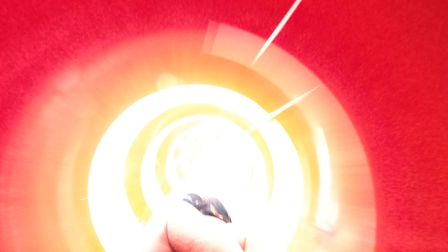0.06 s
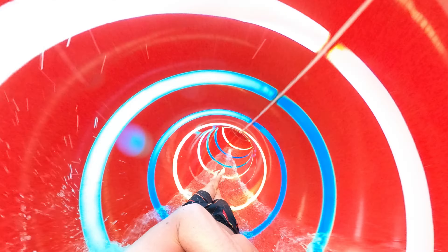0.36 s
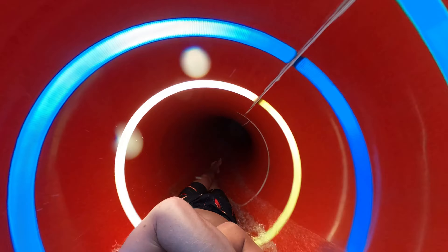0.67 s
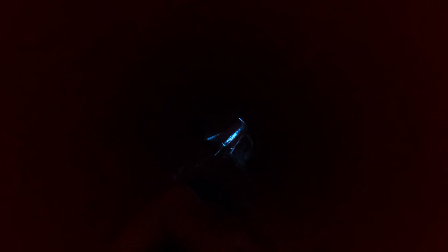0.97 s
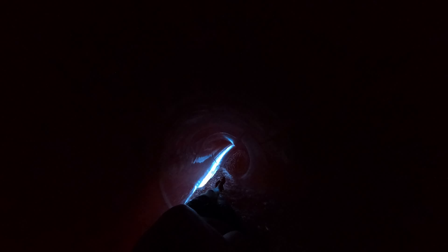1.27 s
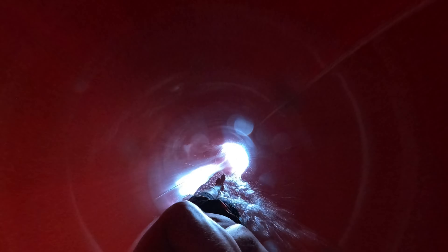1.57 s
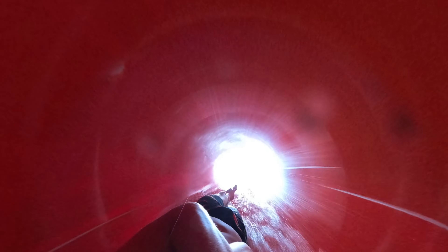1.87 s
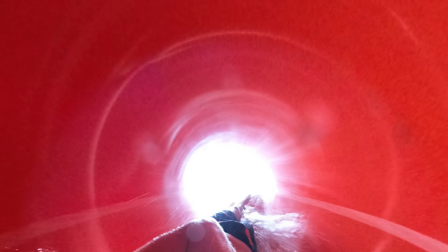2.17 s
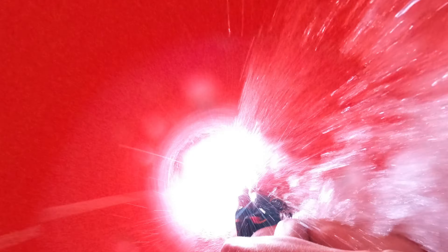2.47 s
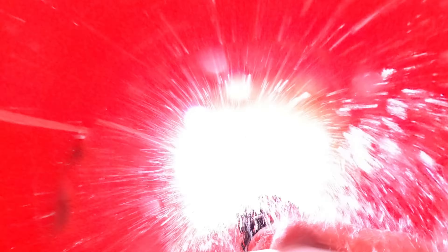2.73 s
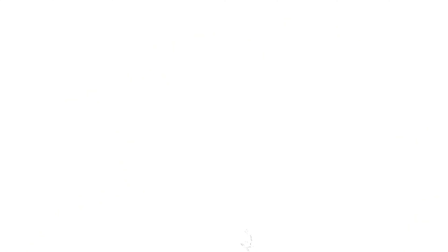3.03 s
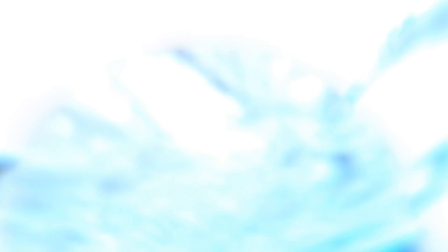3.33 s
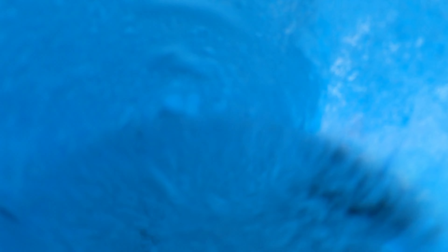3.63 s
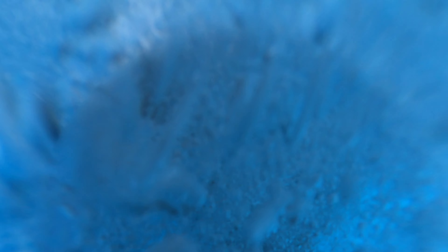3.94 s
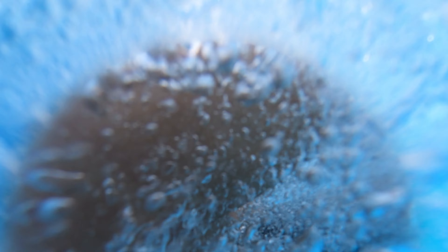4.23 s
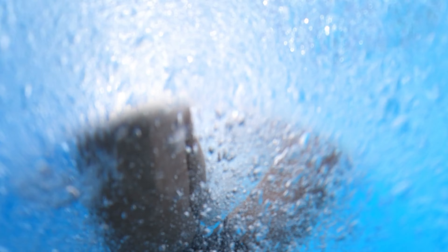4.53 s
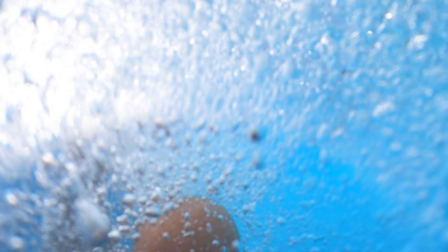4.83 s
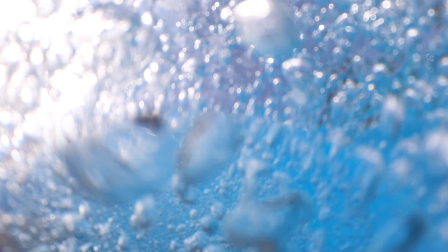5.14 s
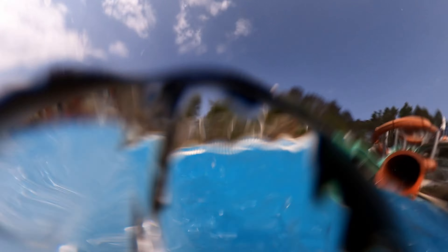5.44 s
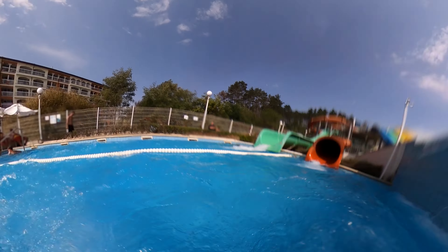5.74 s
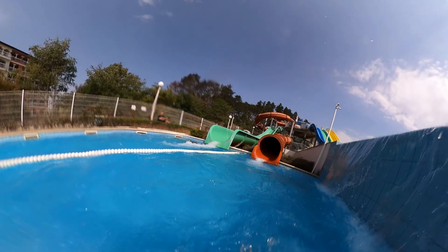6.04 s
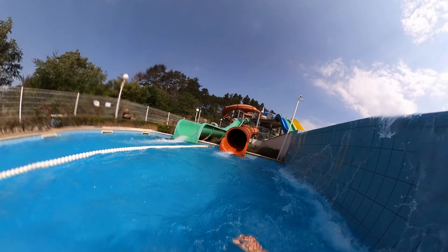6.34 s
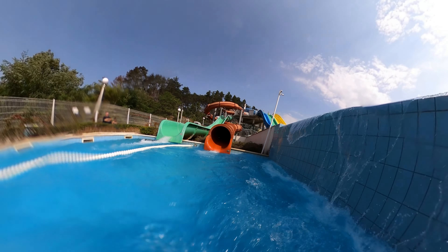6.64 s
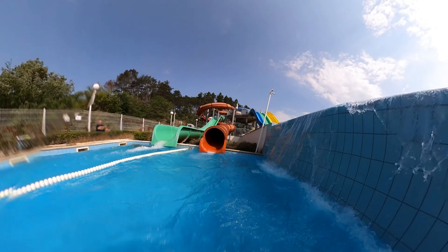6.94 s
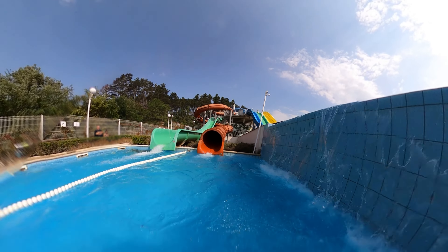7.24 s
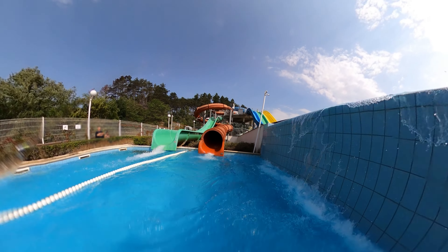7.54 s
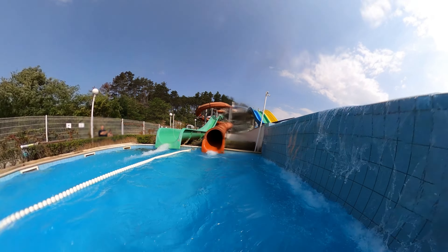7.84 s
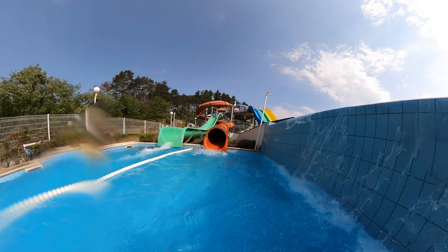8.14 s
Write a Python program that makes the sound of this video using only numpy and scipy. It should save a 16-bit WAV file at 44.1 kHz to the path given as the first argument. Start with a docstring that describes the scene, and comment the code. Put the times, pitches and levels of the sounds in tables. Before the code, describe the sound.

Water roars through a hollow tube slide, then a splashing plunge into loud underwater gurgling, and finally quieter, muffled pool lapping.

```python
"""Tube waterslide and its pool, heard from a riding microphone in a waterproof housing.
Water rushes in the ringing tube and air buffets the microphone port. Spray floods the port in the
run-out. The housing plunges into the pool through eddies, air cavities and ringing bubbles.
It surfaces with a water film over the port, so the wash of the pool swells up muffled."""
import sys
import numpy as np
from scipy import signal
from scipy.fft import rfft, irfft, next_fast_len
from scipy.io import wavfile
from scipy.ndimage import map_coordinates

SR = 44100
rng = np.random.default_rng(int(sys.argv[2]) if len(sys.argv) > 2 else 0)


def log_audio(samples):
    """Write samples as a 16-bit WAV file to the path given in sys.argv[1]."""
    # one column per channel
    frames = np.atleast_2d(samples).T
    # limit to full scale, then quantise
    limited = np.clip(frames, -1, 1)
    pcm = np.round(limited * 32767).astype(np.int16)
    wavfile.write(sys.argv[1], SR, pcm)


N = 370440
TIME_S = np.arange(N) / SR
EXIT_S, DIVE_S, SURFACE_S = 2.72, 3.48, 5.53  # out of the tube, under water, afloat
WET_PORT_HZ, BAND_LIMIT_HZ = 6000, 14500
BURST_TYPICAL_DB, BURST_REST_DB = -30.5, -52.5

# Noise spectra: freq_hz, density_db
SLIDES_SPECTRUM = [(100, -4.5), (300, -6.5), (520, -0.5), (700, -7.5), (1000, -17), (2000, -31),
                   (6000, -88)]  # slides across the pool
SWELL_SPECTRUM = [(12, -1), (32, 3), (55, 3.5), (90, -3), (200, -22.5), (3000, -120)]  # water pressing on the housing
WASH_SPECTRUM = [(50, -26.5), (100, -2), (150, 2), (250, -2), (380, -2.5), (520, -1.5), (680, -2),
                 (950, -10), (1300, -19.5), (2000, -39.5), (4000, -59.5)]  # lapping waves
FOAM_SPECTRUM = [(600, -4.5), (1400, 3), (2000, -1), (2700, -8.5), (3500, -18), (4300, -24.5), (5400, -25),
                 (6400, -30), (8000, -35)]  # foam on the waves
BUFFET_SPECTRUM = [(10, -16), (25, -1), (50, -0.5), (80, -5), (125, -11.5), (190, -27.5), (400, -31.5),
                   (3000, -120)]  # air on the port
SHEET_SPECTRUM = [(80, -5.5), (200, -0.5), (400, -1.5), (800, -1.5), (1400, 0), (2100, -3.5), (3300, -4.5),
                  (5000, -15), (8000, -26.5), (14000, -80.5)]  # water sheet in the tube
SPRAY_SPECTRUM = [(800, -34), (2500, -9.5), (4000, -0.5), (5500, -2), (7000, -8.5), (8500, -15),
                  (10000, -21), (12000, -28.5), (14400, -45.5)]  # spray in the tube
SPLATTER_SPECTRUM = [(500, -0.5), (1100, 3.5), (1600, 0), (2300, -4), (3300, -7.5), (4500, -10),
                     (6000, -18.5), (8000, -23.5), (13000, -36)]  # run-out splashes
MIST_SPECTRUM = [(2000, -25.5), (4000, -2), (5300, -1), (6500, -2), (7500, -10), (9000, -21),
                 (12500, -25.5), (14400, -43)]  # fine run-out spray
SLAP_SPECTRUM = [(1000, -10.5), (2500, 7), (4000, 3), (5200, -1.5), (6000, -15.5), (9000, -26.5),
                 (14000, -40)]  # gouts on the port
DIVE_FOAM_SPECTRUM = [(700, -16), (1400, 4.5), (2500, -0.5), (3100, -8), (4300, -17.5), (5500, -25),
                      (8000, -44), (12000, -73)]  # foam dragged under
GURGLE_SPECTRUM = [(600, -19), (1150, 10), (1600, -1), (2200, -7.5), (2700, -17.5), (3400, -26),
                   (5000, -28.5), (9000, -67.5)]  # tearing air
FROTH_SPECTRUM = [(1500, -27.5), (2700, 7.5), (3500, 1), (4300, -7), (5200, -11.5), (6500, -19.5),
                  (8500, -34.5), (12000, -59.5)]  # its finest crackle
POP_SPECTRUM = [(1000, -9.5), (1700, 5.5), (3000, -8), (5000, -24), (8000, -47)]  # its single bubbles
TURBULENCE_SPECTRUM = [(20, -29.5), (55, -11), (85, 4), (130, 1), (220, 1), (330, -7), (500, -9.5),
                       (1000, -36.5), (5000, -120)]  # eddies on the housing
CLOUD_SPECTRUM = [(100, -16.5), (220, 2.5), (310, 3.5), (430, 2.5), (600, 1), (780, -0.5), (1000, -6),
                  (1300, -14.5), (1800, -12.5), (3000, -50), (10000, -120)]  # bubble cloud

# Waves at the pool surface: time_s, level_db
WAVE_LEVELS = [(5.66, -49.5), (6.06, -47), (6.69, -32), (6.98, -30), (7.53, -24.5), (7.76, -30.5),
               (8.11, -27.5), (8.35, -31)]

# Throb of the tube's air column: centre_hz, width_hz, lift_db
COLUMN_MODES = [(49.3, 22, 2.5)]
# Air resonances across the tube: centre_hz, width_hz, lift_db
CROSS_MODES = [(255, 37, 1), (525.5, 90, 0), (660, 160, 2.5), (1010, 110, 4.5), (1200, 90, 0.5),
               (1635, 160, 1)]
# Main cross resonance along the ride: time_s, level_db
RING_LEVELS = [(0.0, -40), (0.08, -30), (0.24, -40), (0.33, -33), (0.53, -32), (0.66, -29), (0.76, -37),
               (0.85, -29), (1.03, -46), (1.23, -30.5), (1.42, -40), (1.78, -38), (1.95, -36.5),
               (2.12, -38.5), (2.29, -28), (2.45, -36), (2.68, -34.5)]
# Water in the tube: time_s, sheet_db, spray_db
RIDE_LEVELS = [(0.0, -26, -31), (0.07, -25, -34.5), (0.92, -25, -35.5), (1.1, -28.5, -36),
               (1.2, -26.5, -36.5), (1.33, -28.5, -37), (2.08, -29.5, -36), (2.31, -25.5, -31.5),
               (2.6, -29.5, -36.5), (2.68, -29, -34.5)]
# Waves of the sheet breaking close by: start_s, hold_s, level_db
BREAKERS = [(.39, 0.042, -25.5), (.8, 0.051, -30.5)]
# Water washing against the housing in the tube: start_s, hold_s, level_db
SLOSHES = [(0.0, .11, -27.5), (1.9, .3, -33.5), (2.26, 0.45, -28.5)]

# Run-out splashing: time_s, level_db
SPLASH_LEVELS = [(2.74, -28.5), (3.034, -25.5), (3.152, -31.5), (3.25, -32.5), (3.308, -28), (3.42, -31.5),
                 (3.46, -23)]
# Spray sheets sweeping the port clear: start_s, hold_s, level_db
SPRAY_SWEEPS = [(2.7, 0.032, -35.5), (2.918, 0.0062, -46), (2.997, .006, -51.5), (3.035, 0.011, -43.5),
                (3.32, 0.025, -41), (3.37, .06, -54.5), (3.44, 0.016, -43.5)]
# Water film on the port, thinned by spray: time_s, cutoff_hz
FILM_CUTOFFS = [(2.75, 6000), (2.82, 3200), (2.9, 2900), (2.925, 4800), (2.965, 3260), (3.0, 4850),
                (3.05, 5200), (3.09, 3580), (3.26, 3160), (3.3, 5560), (3.36, 6700), (3.4, 4200),
                (3.46, 4440)]
# Gouts of spray hitting the port: start_s, level_db, t60_s
SLAPS = [(2.897, -30, .03), (2.918, -22, .1), (2.987, -26, .1), (2.998, -22, .07), (3.31, -28, .08),
         (3.446, -29, .05)]
# Drops striking the port: start_s, level_db
DROPS = [(2.785, -20), (2.921, -15), (2.967, -27), (3.0, -12), (3.036, -22), (3.244, -26), (3.322, -23.5),
         (3.419, -26)]

# Foam dragged under by the dive: time_s, level_db
DIVE_FOAM_LEVELS = [(3.64, -30.5), (3.77, -28), (3.92, -36), (4.07, -35.5), (4.125, -33.5)]
# Bubbles bursting on the housing: start_s, level_db
CRACKS = [(3.926, -30), (4.0947, -33), (4.2846, -29), (4.3566, -34), (4.453, -24.5), (4.5731, -39),
          (4.6878, -36), (4.738, -32), (5.065, -45), (5.0969, -39), (5.251, -37), (5.3423, -34),
          (5.3573, -33), (5.4446, -36)]
# Small bubbles near the port: start_s, level_db, pitch_hz, ring_cycles
PINGS = [(2.905, -12, 1700, 45), (3.502, -14, 1333, 100), (3.558, -28, 2500, 14), (3.859, -21, 2240, 60),
         (4.024, -21, 2060, 45), (4.257, -22, 1810, 30), (4.293, -22, 2600, 35), (4.452, -22, 1740, 16),
         (4.844, -32, 2130, 150), (5.046, -21, 1500, 50), (5.064, -31, 3500, 55), (5.097, -22, 2400, 18),
         (5.1, -19, 1350, 40), (5.124, -36, 3600, 22), (5.183, -38, 3700, 20), (5.24, -29, 3100, 35),
         (5.251, -27, 2850, 50), (5.255, -19, 1520, 55), (5.263, -45, 4970, 90), (5.299, -32, 3200, 24),
         (5.341, -12, 1000, 30), (5.445, -30, 2800, 25), (5.507, -18, 850, 26)]
# Large air pockets collapsing close by, then from 5.98 s waves lapping at the pool surface: start_s, level_db,
# pitch_hz
GULPS = [(3.482, -4, 726), (3.561, 2.5, 480), (3.634, -2, 710), (3.679, -6, 466), (4.183, -2, 409),
         (4.261, -3, 587), (4.42, 2, 680), (4.777, 4, 724), (4.845, 6, 564), (5.505, 1.5, 473),
         (5.982, -30, 536), (6.063, -29, 536), (6.31, -20, 624), (6.444, -19, 557), (6.533, -24, 431),
         (6.683, -3, 570), (7.271, -8, 622), (7.436, -6, 635), (7.545, -3, 665), (7.681, -12, 675)]
# Big trapped air cavities: start_s, peak_db, start_hz, end_hz, length_s
CAVITIES = [(2.89, -15.5, 220, 275, .09), (2.94, -10.5, 224, 206, .1), (3.42, -14, 90, 98, .11),
            (3.64, -15, 75, 85, .07), (3.65, -17, 255, 280, .07), (3.68, -15, 118, 128, .08),
            (3.81, -20, 430, 455, .07), (3.97, -22, 95, 130, .08), (3.975, -17.5, 545, 600, .08),
            (4.02, -16.5, 620, 670, .08), (4.2, -20, 335, 355, .08), (4.245, -20, 560, 620, .06),
            (4.745, -16.5, 230, 242, .06), (4.835, -16.5, 100, 108, .22), (4.945, -17.5, 195, 210, .07),
            (5.02, -17, 205, 222, .06), (5.05, -15.5, 250, 270, .06), (5.085, -17, 113, 125, .07),
            (5.11, -15, 170, 190, .07), (5.18, -18, 465, 450, .07), (5.2, -16, 150, 190, .13)]
# Trapped air tearing apart: start_s, hold_s, level_db
AIR_BURSTS = [(3.468, 0.026, -23.5), (3.555, .006, -30.5), (3.58, 0.04, -46), (3.64, 0.12, -27),
              (3.75, 0.395, -34), (4.215, 0.054, -31), (4.27, 0.04, -28), (4.355, 0.03, -35),
              (4.39, .04, -41.5), (4.45, .13, -32), (4.6, .06, -43), (4.68, 0.033, -30.5),
              (4.745, 0.055, -37.5), (4.85, 0.014, -47), (4.98, 0.03, -43), (5.05, .15, -37),
              (5.245, 0.065, -33.5), (5.31, .05, -43), (5.358, 0.047, -28.5), (5.42, 0.039, -35)]
# Rising air plume around the housing: time_s, pitch_hz
PLUME_PITCHES = [(4.86, 98.4), (5.02, 107), (5.14, 130), (5.31, 159)]
# Water masses pressing on the housing: start_s, hold_s, level_db
SURGES = [(2.72, 0.46, -20.5), (3.28, .16, -27), (3.48, 0.37, -19.5), (3.85, .2, -27), (4.13, 0.11, -19),
          (4.3, .18, -28), (4.5, .15, -26), (4.73, 0.064, -19), (4.88, .16, -35), (5.07, .23, -26),
          (5.36, 0.13, -22), (5.8, 0.029, -40), (7.88, .04, -29.5)]
# Churn on the housing from the run-out on: time_s, turbulence_db, cloud_db
CHURN_LEVELS = [(2.66, -21, -27.5), (2.94, -17, -21), (2.98, -16, -23.5), (3.27, -23.5, -24),
                (3.32, -14.5, -22), (3.45, -20, -28), (3.474, -13, -18.5), (3.49, -15, -12.5),
                (3.5, -15.5, -25.5), (3.58, -19, -21.5), (3.626, -21, -25), (3.638, -13, -14),
                (3.69, -16, -14.5), (3.81, -18.5, -18), (3.99, -22, -16.5), (4.1, -18.5, -15.5),
                (4.9, -17.5, -17.5), (5.05, -16, -15.5), (5.33, -12.5, -15), (5.38, -24, -16),
                (5.46, -19.5, -17), (5.5, -23, -27)]


def amp(db):
    """Decibels to gain."""
    return 10 ** (np.asarray(db) / 20)


def unit(x):
    """Scale to rms 1."""
    return x / np.sqrt(np.mean(x ** 2) + 1e-20)


def levels(rows, rise_s, fall_s):
    """One gain curve per dB column; 60 dB fades over rise_s and fall_s outside the rows' span."""
    times_s, *columns_db = np.transpose(rows)
    before = np.maximum(times_s[0] - TIME_S, 0) / rise_s
    after = np.maximum(TIME_S - times_s[-1], 0) / fall_s
    return [amp(np.interp(TIME_S, times_s, db) - 60 * (before + after)) for db in columns_db]


def held(rows, rise_s, fall_s):
    """Gain curve of (start_s, hold_s, level_db) events; the strongest prevails."""
    gains = [levels([(s, db), (s + hold_s, db)], rise_s, fall_s)[0] for s, hold_s, db in rows]
    return np.max(gains, axis=0)


def add_at(track, start_s, sound):
    """Mix a sound into the track in place."""
    track[round(start_s * SR):][:len(sound)] += sound


def noise():
    """White noise, rms 1."""
    return rng.standard_normal(N)


def wobble(rate_hz):
    """Smooth random curve with knots at rate_hz."""
    knots = rng.standard_normal(int(N * rate_hz / SR) + 4)
    return map_coordinates(knots, [TIME_S * rate_hz], mode="nearest")


def patter(rate_hz, spread_db):
    """Tiny random impacts of unequal size, rms 1."""
    hits = rng.random(N) < rate_hz / SR
    sizes = amp(spread_db * np.minimum(rng.standard_normal(N), 2.5))
    return unit(hits * sizes * rng.choice([-1, 1], N))


def tick(band_sos, decay_s, length):
    """Band-passed decaying noise burst of length samples, peak 1."""
    age_s = np.arange(length) / SR
    burst = signal.sosfilt(band_sos, rng.standard_normal(length) * np.exp(-age_s / decay_s))
    return burst / np.abs(burst).max()


def bubble(age_s, hz, cycles, glide):
    """A bubble rings down 60 dB over its cycles while its pitch rises by the fraction glide."""
    life = age_s * hz / cycles
    onset = (1 - np.exp(-np.pi * age_s * hz)) ** 2
    return np.sin(2 * np.pi * hz * age_s * (1 + glide * life / 2)) * np.exp(-np.log(1000) * life) * onset


def bubbles(low_hz, high_hz, cycles, glide, spread_db, count):
    """Stream of random bubbles between two pitches, rms 1."""
    when, pitch, size, sustain = rng.random((count, 4)).T[:, :, None]
    hz = low_hz * (high_hz / low_hz) ** pitch
    age_s = np.arange(min(int(SR * cycles / low_hz), 7000000 // count)) / SR
    gain = amp(spread_db * np.minimum(-np.log(1 - size), 3)) * hz / low_hz
    rings = gain * bubble(age_s, hz, cycles * (.5 + sustain), glide)
    index = (when * N).astype(int) + np.arange(len(age_s))
    return unit(np.bincount(index.ravel(), rings.ravel(), N)[:N])


def colour(x, spectrum, modes=()):
    """Minimum-phase filter: spectrum plus resonance humps. Output rms 1."""
    size = 2 * next_fast_len(N // 2 + 8192)
    hz = np.fft.rfftfreq(size, 1 / SR)
    freq_hz, density_db = np.transpose(spectrum)
    shape_db = np.interp(np.log(hz + 1), np.log(freq_hz), density_db)
    for centre_hz, width_hz, lift_db in modes:
        shape_db += lift_db / (1 + (2 * (hz - centre_hz) / width_hz) ** 2)
    cepstrum = irfft(np.log(amp(shape_db)))
    cepstrum[1:size // 2] *= 2
    cepstrum[size // 2 + 1:] = 0
    return unit(irfft(rfft(x, size) * np.exp(rfft(cepstrum)))[:N])


def muffle(x, cutoff_hz, slope_db_oct, ring_db=0):
    """Moving low-pass with optional resonance near the cutoff."""
    hz, frames_s, spectra = signal.stft(x, SR, nperseg=256)
    ratio = hz[:, None] / np.interp(frames_s, TIME_S, cutoff_hz)
    ring = amp(ring_db / (1 + ((ratio - .95) / .12) ** 2))
    loss = np.sqrt(1 + ratio ** (slope_db_oct / (10 * np.log10(2))))
    return signal.istft(spectra * ring / loss, SR, nperseg=256)[1][:N]


def pool():
    """Lapping waves and the hollow roar of distant slides, dulled by the wet port."""
    waves, = levels(WAVE_LEVELS, rise_s=.3, fall_s=1)
    afloat = held([(SURFACE_S, N / SR, 0)], rise_s=.05, fall_s=1)
    splashes = patter(rate_hz=900, spread_db=4.5)
    swell = amp(-14.5) * waves + amp(-49.5) * afloat
    rocking = amp(1.1 * wobble(7)) * swell * colour(noise(), SWELL_SPECTRUM)
    wash = amp(.5 + .23 * wobble(19)) * waves * colour(noise() + .5 * splashes, WASH_SPECTRUM)
    foam = amp(-20.5 + .62 * wobble(20)) * waves * colour(noise() + .5 * splashes, FOAM_SPECTRUM)
    slides = amp(-42.5) * afloat * colour(noise(), SLIDES_SPECTRUM, CROSS_MODES)
    return muffle(rocking + wash + foam + slides, np.full(N, WET_PORT_HZ), slope_db_oct=48)


def tube_ring(centre_hz=528, width_hz=68):
    """Air rings across the tube; the pitch wanders as the rider blocks more or less of the bore."""
    ringing, = levels(RING_LEVELS, rise_s=.1, fall_s=.45)
    lowpass = signal.butter(2, width_hz / 2, fs=SR, output="sos")
    envelope = signal.sosfilt(lowpass, noise() + 1j * noise())
    pitch_hz = centre_hz * (1 + .025 * wobble(7))
    return ringing * unit(np.real(envelope * np.exp(2j * np.pi * np.cumsum(pitch_hz) / SR)))


def tube_ride(buffet_db=-21):
    """Air thumps on the port, the water sheet roars in the tube's modes, spray hisses."""
    sheet, spray = levels(RIDE_LEVELS, rise_s=.1, fall_s=1)
    breaking = held(BREAKERS, rise_s=.17, fall_s=.3)
    sheet = np.hypot(sheet, breaking)
    spray = np.hypot(spray, amp(-14) * breaking)
    buffet = held([(.03, EXIT_S, buffet_db)], rise_s=.11, fall_s=.27)
    air = amp(.6 * wobble(10)) * buffet * colour(noise(), BUFFET_SPECTRUM, COLUMN_MODES)
    sheet *= amp(.18 + .28 * wobble(23))
    roar = sheet * colour(noise() + .5 * patter(rate_hz=2500, spread_db=3.5), SHEET_SPECTRUM, CROSS_MODES)
    spray *= amp(.5 + 1.3 * wobble(10.75))
    hiss = spray * colour(noise() + .5 * patter(rate_hz=4300, spread_db=-1.5), SPRAY_SPECTRUM)
    wetting_hz = np.interp(TIME_S, [EXIT_S, EXIT_S + .08], [SR / 2, WET_PORT_HZ])
    return air + roar + muffle(hiss, wetting_hz, slope_db_oct=40)


def runout(mist_rest_db=-61):
    """Splashes sound through the port's water film; fine hiss swells as spray sweeps it clear."""
    splashing, = levels(SPLASH_LEVELS, rise_s=.21, fall_s=.055)
    sweeps = held(SPRAY_SWEEPS + [(EXIT_S, DIVE_S - EXIT_S, mist_rest_db)], rise_s=.088, fall_s=.14)
    film_hz = np.interp(TIME_S, *np.transpose(FILM_CUTOFFS))
    impacts = patter(rate_hz=1800, spread_db=4.5)
    splatter = colour(.77 * noise() + impacts, SPLATTER_SPECTRUM)
    splatter = muffle(splatter, film_hz, slope_db_oct=38, ring_db=2)
    droplets = patter(rate_hz=900, spread_db=4.5)
    mist = colour(.53 * noise() + droplets, MIST_SPECTRUM)
    return amp(3 + wobble(45)) * splashing * splatter + amp(3.2 * wobble(46)) * sweeps * mist


def slaps(rise_s=.002):
    """Gouts of spray hit the port and spatter away."""
    envelope, age_s = np.zeros(N + SR), np.arange(SR // 4) / SR
    spatter = colour(noise() + patter(rate_hz=2500, spread_db=4), SLAP_SPECTRUM)
    onset = 1 - np.exp(-age_s / rise_s)
    for start_s, level_db, t60_s in SLAPS:
        add_at(envelope, start_s, amp(level_db) * onset * np.exp(-np.log(1000) * age_s / t60_s))
    return envelope[:N] * spatter


def drops():
    """Drops tick on the port."""
    track = np.zeros(N + SR)
    port = signal.butter(3, [2500, 6500], "band", fs=SR, output="sos")
    for start_s, level_db in DROPS:
        add_at(track, start_s, amp(level_db - 6.5) * tick(port, decay_s=.0012, length=SR // 10))
    return track[:N]


def cracks():
    """Bubbles burst on the housing with a dry crack."""
    track = np.zeros(N + SR)
    housing = signal.butter(4, [1800, 4800], "band", fs=SR, output="sos")
    for start_s, level_db in CRACKS:
        add_at(track, start_s, amp(level_db - 5.5) * tick(housing, decay_s=.0022, length=SR // 20))
    return track[:N]


def dive_foam():
    """Tiny bubbles from the dive merge into an even fizz."""
    foam, = levels(DIVE_FOAM_LEVELS, rise_s=.11, fall_s=.11)
    tiny = bubbles(low_hz=1300, high_hz=5000, cycles=16, glide=.05, spread_db=.8, count=12000)
    return foam * colour(noise() + .9 * tiny, DIVE_FOAM_SPECTRUM)


def tearing_gain():
    """How hard trapped air tears under water: bursts over a faint floor."""
    return held(AIR_BURSTS + [(DIVE_S, SURFACE_S - DIVE_S, BURST_REST_DB)], rise_s=.14, fall_s=.14)


def tearing_air():
    """Trapped air tears into gurgle, single pops and a froth that grows faster than either."""
    tearing = tearing_gain()
    frothing = amp(-46.5) * (tearing / amp(BURST_TYPICAL_DB)) ** 1.65
    medium = bubbles(low_hz=1100, high_hz=2900, cycles=20, glide=.08, spread_db=1.5, count=9000)
    small = bubbles(low_hz=2600, high_hz=6000, cycles=28, glide=.05, spread_db=1.8, count=9000)
    single = bubbles(low_hz=1300, high_hz=4600, cycles=32, glide=.06, spread_db=1.5, count=1500)
    crackle = patter(rate_hz=1500, spread_db=3.5)
    flutter = amp(.65 * wobble(55))
    gurgle = amp(1) * tearing * colour(.45 * noise() + .55 * medium + .9 * crackle, GURGLE_SPECTRUM)
    frothing *= amp(.87 * wobble(70))
    froth = frothing * colour(.35 * noise() + .28 * small + crackle, FROTH_SPECTRUM)
    pops = amp(-11.5) * tearing * colour(single, POP_SPECTRUM)
    return flutter * (gurgle + froth + pops)


def cavities():
    """Big air cavities glug, each wavering along a glide between two pitches."""
    track = np.zeros(N + SR)
    for start_s, peak_db, start_hz, end_hz, length_s in CAVITIES:
        progress = np.linspace(0, 1, round(length_s * SR))
        waver = .02 * map_coordinates(rng.standard_normal(5), [4 * progress], mode="nearest")
        pitch_hz = (start_hz + (end_hz - start_hz) * progress) * (1 + waver)
        tone = np.sin(2 * np.pi * np.cumsum(pitch_hz) / SR)
        add_at(track, start_s, amp(peak_db) * np.sin(np.pi * progress) * tone)
    return track[:N]


def close_bubbles():
    """Air pockets collapse with a gulp and, once afloat, waves lap with a glug; small bubbles ping."""
    track, age_s = np.zeros(N + SR), np.arange(SR // 10) / SR
    for start_s, level_db, pitch_hz in GULPS:
        add_at(track, start_s, amp(level_db - 8.5) * bubble(age_s, pitch_hz, cycles=13, glide=.16))
    for start_s, level_db, pitch_hz, cycles in PINGS:
        add_at(track, start_s, amp(level_db) * bubble(age_s, pitch_hz, cycles, glide=.022))
    return track[:N]


def plume_filter(x, q=1.24, gain_db=-3.5):
    """The air plume rings higher as it rises and swallows the bass below its pitch."""
    hz, frames_s, spectra = signal.stft(x, SR, nperseg=4096)
    times_s, pitch_hz = np.transpose(PLUME_PITCHES)
    ratio = hz[:, None] / np.interp(frames_s, times_s, pitch_hz)
    highpass = ratio ** 4 / np.abs(1 - ratio ** 2 + 1j * ratio / q) ** 2
    inside = held([(times_s[0], times_s[-1] - times_s[0], 0)], rise_s=.2, fall_s=.2)
    mix = np.interp(frames_s, TIME_S, inside)
    return signal.istft(spectra * (1 - mix + mix * amp(gain_db) * highpass), SR, nperseg=4096)[1][:N]


def churn():
    """Surges, eddies and air pockets rumble on the housing in a bubble cloud: sloshes, then the dive."""
    turbulence, cloud = levels(CHURN_LEVELS, rise_s=.15, fall_s=.2)
    slosh = held(SLOSHES, rise_s=.69, fall_s=.22)
    surge = held(SURGES, rise_s=.5, fall_s=.33)
    pockets = bubbles(low_hz=90, high_hz=380, cycles=9, glide=.1, spread_db=.5, count=1600)
    swarm = bubbles(low_hz=280, high_hz=1500, cycles=20, glide=.12, spread_db=.8, count=4000)
    knocks = patter(rate_hz=350, spread_db=3)
    rumble = np.maximum(amp(.25) * turbulence, slosh) * colour(3 * noise() + pockets, TURBULENCE_SPECTRUM)
    # Harder tearing: smaller bubbles, brighter cloud.
    tearing_db = np.maximum(20 * np.log10(tearing_gain() + 1e-9), BURST_REST_DB)
    cutoff_hz = 1700 * 2 ** ((tearing_db - BURST_TYPICAL_DB) / 20)
    bubbling = colour(noise() + .75 * swarm + .2 * knocks, CLOUD_SPECTRUM)
    bubbling = np.maximum(amp(.22) * cloud, amp(-3) * slosh) * muffle(bubbling, cutoff_hz, slope_db_oct=30)
    return surge * colour(noise(), SWELL_SPECTRUM) + plume_filter(rumble) + bubbling


def scene():
    """Tube, run-out, dive and pool, mono."""
    sliding = tube_ride() + tube_ring() + runout() + slaps()
    diving = churn() + dive_foam() + cavities() + tearing_air() + cracks()
    return (sliding + diving + pool() + drops() + close_bubbles())[None]


def record(dry):
    """Soft clip at 0.9, then a brick-wall low-pass."""
    rounded = dry / (1 + np.abs(dry / .9) ** 6) ** (1 / 6)
    size = next_fast_len(N + SR // 2)
    passband = np.fft.rfftfreq(size, 1 / SR) < BAND_LIMIT_HZ
    return irfft(rfft(rounded, size) * passband, size)[:, :N]


dry = scene()
out = record(dry)
log_audio(out)
```